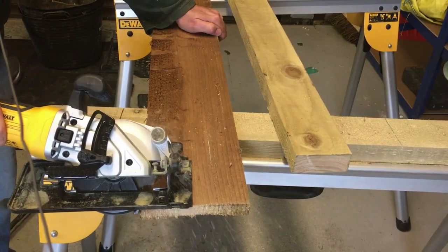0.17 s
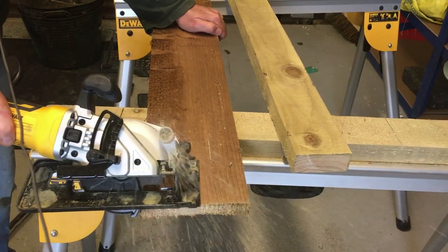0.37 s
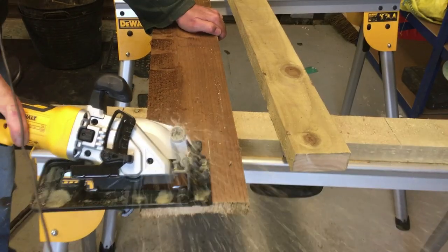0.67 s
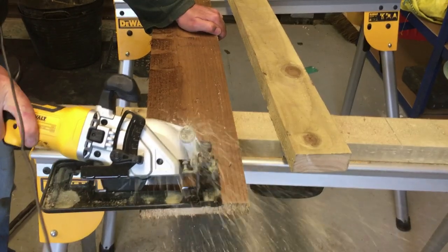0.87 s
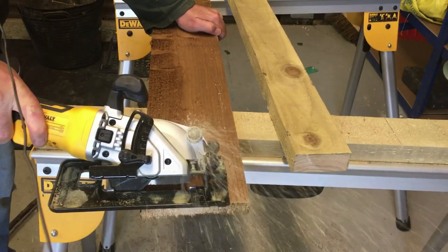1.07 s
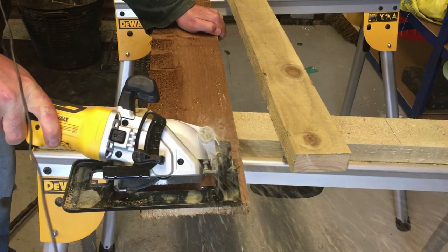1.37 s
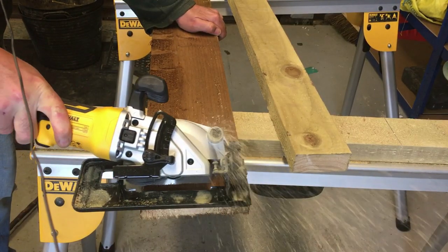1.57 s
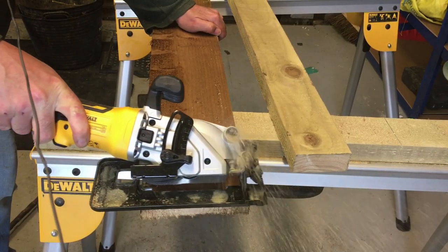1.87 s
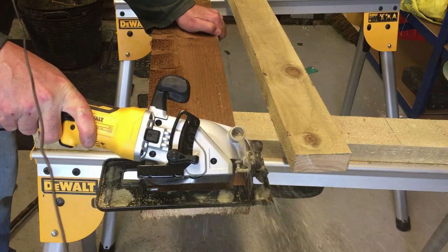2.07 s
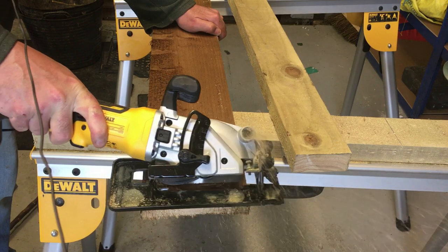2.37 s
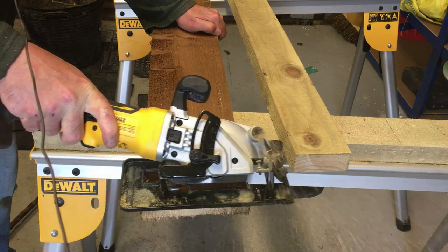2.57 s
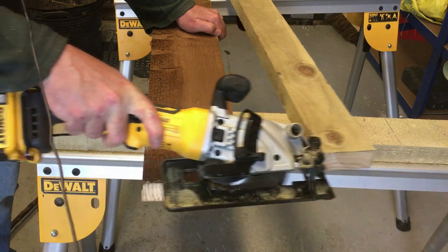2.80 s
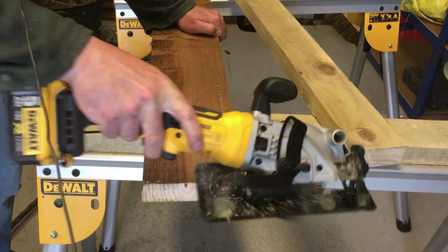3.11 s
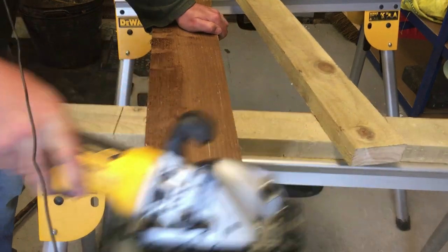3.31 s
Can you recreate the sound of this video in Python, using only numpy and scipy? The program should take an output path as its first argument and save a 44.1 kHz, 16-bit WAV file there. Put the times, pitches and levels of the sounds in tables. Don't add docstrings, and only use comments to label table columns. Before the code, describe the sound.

A small cordless circular saw, already running, cuts a board close to the microphone in a garage, with whining gears, rasping teeth and hissing chips. From 1.2 s its pitch sags into a rough, chattering growl; it eases near 2.1 s, bites again, then runs freer and quieter after 2.7 s. At 3.07 s it brakes with a hard knock, rattles, faint blade ringing and a small snap at 3.34 s.

```python
import sys
import numpy as np
from scipy import signal
from scipy.fft import rfft, irfft, next_fast_len
from scipy.io import wavfile
from scipy.ndimage import uniform_filter1d, map_coordinates

SR = 44100
rng = np.random.default_rng(int(sys.argv[2]) if len(sys.argv) > 2 else 0)


def persist_wave(psi):
    counts = np.round(np.clip(psi, -1, 1) * 32767).astype(np.int16)
    wavfile.write(sys.argv[1], SR, np.atleast_2d(counts).T)


def decibels_to_gain(level_db):
    exponent = np.asarray(level_db, float) / 20
    return 10 ** exponent


N = 152145
T = np.arange(N) / SR

# (time [s], motor speed [Hz], gear whine [dB], its overtone [dB], rotor hum [dB])
MOTOR = [(0, 439.9, -55.5, -65, -65), (.45, 441.1, -47, -61, -75), (1.01, 445.6, -49, -72, -68.5),
         (1.2, 420.6, -51, -56, -61.5), (1.33, 398.5, -58, -49.5, -60), (1.45, 386, -56.5, -43.5, -67),
         (1.58, 353.9, -58, -47, -81), (1.7, 334.2, -52, -55, -71.5), (1.9, 330.3, -58, -53, -76),
         (2.055, 342, -73, -57, -72), (2.09, 397.8, -51, -65, -70), (2.15, 412.8, -55, -64, -65),
         (2.3, 426.1, -49, -53, -69), (2.46, 388.5, -65, -61, -65), (2.57, 395.8, -52, -63, -68),
         (2.69, 455.3, -52.5, -68, -58), (2.84, 441, -73, -75, -62), (3.07, 440, -61, -78, -64.5)]
# (multiple of motor speed, level [dB])
SHAFT_ORDERS = [(2, -65), (14, -63), (5, -64.5), (6, -66.5), (19, -63), (20, -72)]
# (time [s], tooth thrum [dB], tooth rasp [dB], rush of chips [dB])
CUT = [(0, -58.5, -63, -50), (.25, -55.5, -61, -48.5), (.5, -59.5, -44.5, -46), (.8, -52, -46.5, -46),
       (1.05, -61.5, -48, -48), (1.17, -58.5, -41.5, -48.5), (1.3, -57, -55, -48), (1.37, -43, -52, -48),
       (1.56, -53.5, -43.5, -48.5), (1.75, -43.5, -37.5, -42), (2.045, -43.5, -38, -39),
       (2.078, -70, -60, -42), (2.12, -51, -43.5, -45.5), (2.38, -52, -43, -43), (2.6, -56.5, -41, -42),
       (2.71, -47, -59, -43.5), (2.76, -53.5, -66.5, -50.5), (3.07, -77, -60, -69)]
# (time [s], second tooth overtone [dB], third [dB], top overtones over the rasp [dB],
# fine dust spray [dB])
BITE = [(0, -56, -80, -10, -66), (.3, -50.5, -70, -8, -55.5), (.55, -52.5, -62, -10, -57.5),
        (.86, -51.5, -61, -15, -50.5), (1.02, -56.5, -65, -2, -58), (1.17, -54, -51.5, 0, -49),
        (1.3, -60.5, -61, 8, -62), (1.42, -50.5, -76, -5, -57), (1.56, -48, -52.5, 0.5, -61),
        (1.73, -42, -49, -3, -60), (2.03, -47, -51, 3, -50), (2.09, -62, -68, 7, -62),
        (2.13, -45, -49, 3.5, -58), (2.3, -45, -47.5, 7, -52), (2.46, -42.5, -56, -4.5, -64),
        (2.6, -51, -52, 3, -44), (2.72, -64, -68, 0, -67), (3.07, -60, -77, 0, -68)]
# (time [s], roughness [ratio])
CHATTER = [
    (1.48, .4),
    (1.64, 1.3),
    (2.7, 1.3),
    (2.8, .5),
]
# (frequency [Hz], level [dB])
RASP_COLOUR = [(2500, -2.5), (3300, -1), (4200, -5.5), (5300, -5.5), (6700, 3), (8200, -5), (10000, -13),
               (15500, -15.5)]
# (frequency [Hz], width [Hz], level [dB])
BLADE_AND_GUARD = [(1320, 204, 4.5), (2470, 610, 5), (3700, 510, 1), (6276, 640, 11), (6790, 320, 7),
                   (7700, 440, 1), (9040, 250, -1)]
# (middle [s], length [s],
# frequency [Hz], level [dB])
SING = [(0.33, 0.066, 6990, -35.5), (0.47, 0.24, 9840, -56.5), (0.56, 0.3, 10800, -61),
        (0.88, 0.076, 8810, -54), (1.165, 0.018, 6300, -49), (2.01, 0.03, 2500, -44),
        (2.29, 0.039, 780, -54.5), (1.81, 0.045, 1285, -50), (0.53, 0.0096, 7150, -43),
        (0.919, 0.046, 7010, -39), (1.13, 0.048, 6900, -45), (2.02, 0.036, 2640, -41),
        (1.925, 0.011, 1300, -46), (2.097, 0.0072, 6330, -35.5), (2.55, 0.049, 6320, -34),
        (2.516, 0.43, 2392, -51), (2.69, 0.051, 2340, -43)]
# (frequency [Hz], level [dB per Hz])
CHIP_COLOUR = [(150, -55), (250, -15), (1170, -2), (1620, -7), (2330, 2.5), (2920, -3.5), (4490, -2.5),
               (7040, -5), (15600, -15)]
DUST_COLOUR = [(5000, -60), (8000, -17), (11500, -2.5), (15700, -4)]
FAN_COLOUR = [(150, -59), (250, -23), (435, -11), (491, -7.5), (2250, -2.5), (3070, -12.5), (3980, -7),
              (8090, -10.5), (15600, -29)]
# (time [s], depth [dB])
LULLS = [(.208, 12), (.463, 12), (1.277, 13), (1.648, 11), (1.925, 11), (2.228, 11), (2.76, 9), (3.25, 3)]
# (time [s], level [dB], low modes [dB])
KNOCKS = [
    (3.073, -37, -5),
    (3.092, -37, -8),
    (3.175, -37, -20),
    (3.193, -39, -18),
    (3.225, -46, -16),
]
# (frequency [Hz], level [dB], t60 [s])
KNOCK_MODES = [(348.7, 14.5, 0.061), (452, 5, 0.12), (531, -7, 0.082), (660, 13, 0.082), (1373, 8, 0.15),
               (1560, 5, 0.19), (2275, 8, 0.12), (5640, 2, .04)]
BLADE_MODES = [(860, -69, 2), (2126, -65, 2), (2304, -56, .8), (2875, -67, 2), (5200, -70, 2),
               (6300, -58, .7), (6638, -57, .9), (7900, -63, .8)]
# (frequency [Hz], level [dB per Hz])
BLOW_COLOUR = [(120, -14), (250, -4.5), (500, -2.5), (900, -4.5), (1400, 0.5), (2300, -1), (3300, -8),
               (6000, -6.5), (15600, -18)]
CLATTER_COLOUR = [(150, -27), (670, -14), (1400, -2.5), (1850, -2), (2300, -0.5), (3300, -10.5),
                  (6500, -4.5), (9000, -19.5), (15600, -26)]
# (time [s], level [dB])
THUMPS = [(.01, -60), (.11, -63), (1.761, -62), (1.845, -55), (2.011, -55), (2.27, -74), (2.375, -64),
          (2.95, -62.5), (3.285, -69), (3.33, -72), (3.42, -84)]
# (time [s], level [dB])
SHUDDER = [(1.62, -81), (1.68, -67), (1.9, -69.5), (1.94, -81), (1.98, -65.5), (2.04, -54), (2.07, -84),
           (2.5, -86), (2.56, -72), (2.63, -83), (2.7, -66), (2.75, -79)]
# (frequency [Hz], t60 [s])
GARAGE = [(200, 0.21), (2000, 0.43), (10000, 0.087)]

TEETH_PER_TURN, TEETH = 4, 24
STOP_S, BRAKE_S = 3.07, 0.023
BLOW_DB, BLOW_HOLD_S, BLOW_T60 = -34, 0.026, 0.16
CLATTER_DB, CLATTER_HOLD_S, CLATTER_T60 = -46.5, 0.14, 0.52
THUD_DB, THUD_HZ, THUD_T60, THUD_LAG_S = -31, 380, 0.04, 0.003
SNAP_S, SNAP_DB, SNAP_T60 = 3.342, -64, 0.06


def unit(x):
    return x / np.sqrt(np.mean(x ** 2) + 1e-20)


def along(points, hz):
    f, v = np.transpose(points)
    return np.interp(np.log(hz + 1), np.log(f + 1), v)


def curves(rows):
    s, *cols = np.transpose(rows)
    return [np.interp(T, s, c) for c in cols]


def wobble(rate):
    coarse = T[::16]
    knots = rng.standard_normal(N // 80)
    return np.interp(T, coarse, map_coordinates(knots, [coarse * rate]))


def filtered(x, response):
    m = next_fast_len(N + SR // 2)
    return irfft(rfft(x, m) * response(np.fft.rfftfreq(m, 1 / SR)), m)[..., :N]


def rush(spectrum, patchy_db):
    z = signal.stft(rng.standard_normal(N), nperseg=512)[2]
    field = uniform_filter1d(rng.standard_normal(z.shape), size=5, axis=0)
    field = uniform_filter1d(field, size=8, axis=1)
    x = signal.istft(z * decibels_to_gain(patchy_db * unit(field)), nperseg=512)[1][:N]
    return unit(filtered(x, lambda hz: decibels_to_gain(along(spectrum, hz))))


def fuzzy(phase, rough, rate):
    waver = 1 + rough * (wobble(rate) + 1j * wobble(rate))
    return np.real(waver * np.exp(1j * phase)) * np.sqrt(2 / (1 + 2 * rough ** 2))


def lulls():
    return decibels_to_gain(-sum(db * np.exp(-((T - s) / 0.011) ** 4) for s, db in LULLS))


def motor(turn, rough, load_db):
    _, gear_db, over_db, hum_db = curves(MOTOR)
    shaft = sum(decibels_to_gain(db + 0.22 * load_db + 3.6 * wobble(4.86)) * fuzzy(k * turn, rough=0.27, rate=60)
                for k, db in SHAFT_ORDERS)
    whine = decibels_to_gain(gear_db + 1.5 * wobble(8.97)) * fuzzy(9 * turn, rough=rough / 2, rate=60)
    overtone = decibels_to_gain(over_db) * fuzzy(18 * turn, rough=0.22, rate=110)
    hum = decibels_to_gain(hum_db) * fuzzy(turn, rough=0.46, rate=29)
    return shaft + whine + overtone + hum


def teeth(turn, hz, rough):
    thrum_db, rasp_db, _ = curves(CUT)
    second_db, third_db, top_db, _ = curves(BITE)
    blade = turn * TEETH_PER_TURN / TEETH
    runout = 1 + 0.14 * np.exp(1j * blade) + 0.1 * np.exp(-1j * blade)
    strike = TEETH_PER_TURN * turn + 0.12 * rough * wobble(300)

    thrum = decibels_to_gain(thrum_db + 2 * rough * wobble(20)) * np.abs(runout) ** 2
    thrum *= fuzzy(strike, rough=rough, rate=150)
    thrum += decibels_to_gain(second_db) * fuzzy(2 * strike, rough=rough, rate=230)
    thrum += decibels_to_gain(third_db) * fuzzy(3 * strike, rough=rough, rate=260)

    rasp = np.zeros(N)
    for k in range(4, 12):
        level_db = along(RASP_COLOUR, k * TEETH_PER_TURN * hz) + (k > 5) * top_db + 2.9 * wobble(18)
        tone = fuzzy(k * strike + np.angle(runout), rough=0.44 + rough / 2, rate=200)
        rasp += decibels_to_gain(level_db) * np.abs(runout) * tone
    return thrum + decibels_to_gain(rasp_db - 5.0) * rasp


def singing_blade():
    return sum(decibels_to_gain(db) * np.exp(-((T - s) / span) ** 2) * fuzzy(2 * np.pi * f * T, rough=0.45, rate=80)
               for s, span, f, db in SING)


def blade_and_guard(hz):
    modes = sum(decibels_to_gain(db) * 1j * hz * w / (c * c - hz * hz + 1j * hz * w) for c, w, db in BLADE_AND_GUARD)
    return 0.22 + np.abs(modes)


def chips_and_air(turn, rush_db):
    pulse = 1 + 0.26 * np.cos(TEETH_PER_TURN * turn)
    chips = unit(filtered(rush(CHIP_COLOUR, patchy_db=1.6) * pulse, blade_and_guard))
    chips *= decibels_to_gain(rush_db + 0.58 * wobble(14) + 0.69 * wobble(70))
    fan = decibels_to_gain(-51 + 1.4 * wobble(13)) * rush(FAN_COLOUR, patchy_db=1.4)
    dust_db = curves(BITE)[3]
    dust = decibels_to_gain(dust_db + 2.7 * wobble(16) + 2.3 * wobble(60)) * rush(DUST_COLOUR, patchy_db=4.5)
    return chips + fan + dust


def saw():
    hz = curves(MOTOR)[0]
    rush_db = curves(CUT)[2]
    rough, = curves(CHATTER)
    turn = 2 * np.pi * np.cumsum(hz + 0.596 * wobble(25)) / SR
    load_db = np.clip(rush_db - rush_db.mean(), -8, 8)
    tones = motor(turn, rough, load_db) + teeth(turn, hz, rough) + singing_blade()
    running = 1 / (1 + np.exp(np.clip((T - STOP_S) / BRAKE_S * 4, -50, 50)))
    return running * tones, running * chips_and_air(turn, rush_db)


def offcut_knocks():
    out, t = np.zeros(N + SR), T[:SR // 2]
    for s, db, low_db in KNOCKS:
        ring = np.zeros(len(t))
        for hz, level, t60 in KNOCK_MODES:
            size = decibels_to_gain(level + low_db * (hz < 1000) + rng.normal(0, 2) - 60 * t / t60)
            ring += size * np.sin(2 * np.pi * hz * (1 + rng.normal(0, 0.03)) * t)
        noise = uniform_filter1d(rng.standard_normal(len(t) + 1), size=4)
        crack = 5.4 * decibels_to_gain(-60 * t / 0.018) * np.diff(noise)
        out[round(s * SR):][:len(t)] += decibels_to_gain(db - 12) * (ring + crack)
    return out[:N]


def stop():
    since = T - KNOCKS[0][0]

    def fade(hold, t60):
        return decibels_to_gain(-60 * np.maximum(since - hold, 0) / t60 + 1.2 * wobble(80))

    blade = sum(decibels_to_gain(db - 60 * since / t60) * fuzzy(2 * np.pi * hz * T, rough=0.2, rate=20)
                for hz, db, t60 in BLADE_MODES)
    blow = decibels_to_gain(BLOW_DB) * fade(BLOW_HOLD_S, BLOW_T60) * rush(BLOW_COLOUR, patchy_db=-2.0)
    clatter = decibels_to_gain(CLATTER_DB) * fade(CLATTER_HOLD_S, CLATTER_T60) * rush(CLATTER_COLOUR, patchy_db=4.5)
    clatter *= lulls()
    thud = decibels_to_gain(THUD_DB - 60 * np.abs(since - THUD_LAG_S) / THUD_T60) * np.sin(2 * np.pi * THUD_HZ * since)
    thud *= np.clip(since / THUD_LAG_S, 0, 1)
    snap = (T > SNAP_S) * decibels_to_gain(SNAP_DB - 60 * np.abs(T - SNAP_S) / SNAP_T60)
    snap *= np.diff(rng.standard_normal(N + 1))
    return offcut_knocks() + np.where(since > 0, thud + snap + blade + blow + clatter, 0)


def low_rumble():
    pushes = np.zeros(N)
    for s, db in THUMPS:
        pushes[round(s * SR)] = decibels_to_gain(db)
    t = T[:SR // 8]
    jolt = 4 * np.sin(2 * np.pi * 48 * t) * (t / 0.0065) * np.exp(-t / 0.0055)
    jolts = np.convolve(pushes, jolt)[:N]
    board = rush([(20, -3), (60, -7.5), (250, -7.5), (420, -10), (1500, -120)], patchy_db=2.5)
    shudder = decibels_to_gain(curves(SHUDDER)[0] + 4.3 * wobble(24.22)) * board
    low_noise = rush([(20, 0), (70, -4), (200, 0), (700, -120)], patchy_db=1.5)
    return jolts + shudder + decibels_to_gain(-92 + 4 * wobble(12)) * low_noise


def garage(x):
    hz, t, z = signal.stft(rng.standard_normal(SR // 2), SR, nperseg=256)
    decay = decibels_to_gain(-60 * t / along(GARAGE, hz)[:, None])
    tail = signal.istft(z * decay, SR, nperseg=256)[1]
    delayed = np.pad(x, (300, 0))
    return signal.fftconvolve(delayed, tail / np.linalg.norm(tail))[:N]


def knock_band(hz):
    return (1j * hz / (130 + 1j * hz) / (1 + 1j * hz / 12000)) ** 2


def scene():
    tones, chips = saw()
    blows = filtered(stop(), knock_band)
    room = decibels_to_gain(-11.5) * garage(tones + chips + blows)
    mono = tones + blows + lulls() * (chips + room + low_rumble())
    return np.array([mono, mono])


def top_cut(x):
    return signal.sosfilt(signal.butter(12, 15760, fs=SR, output="sos"), x)


def record(dry):
    soft = dry / (1 + np.abs(dry / 0.04) ** 5) ** (1 / 5)
    soft = filtered(soft, lambda hz: hz < 15740)
    return top_cut(soft)


dry = scene()
out = record(dry)
persist_wave(out)
```